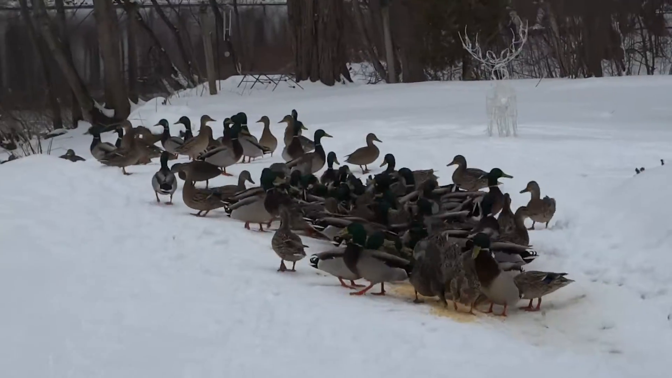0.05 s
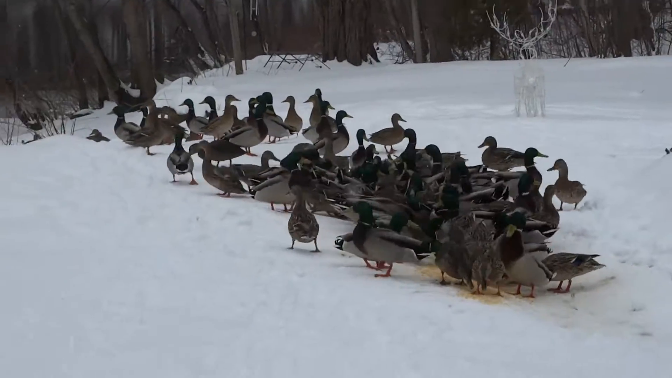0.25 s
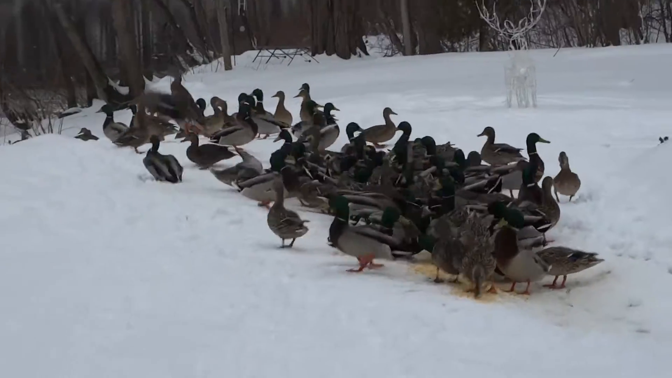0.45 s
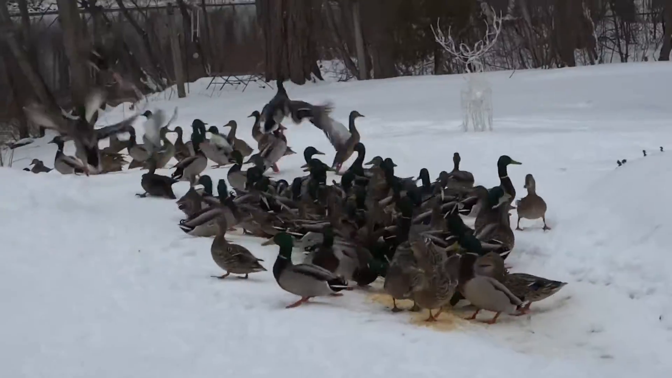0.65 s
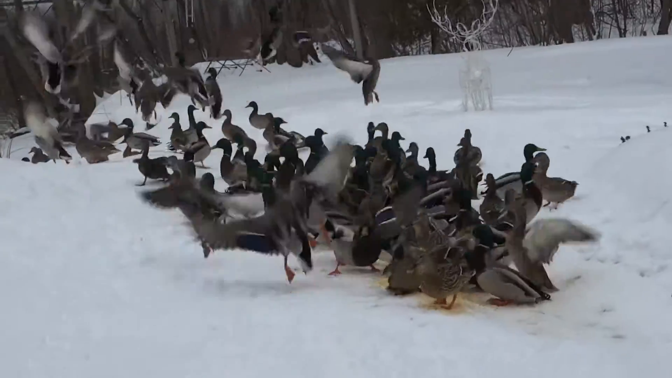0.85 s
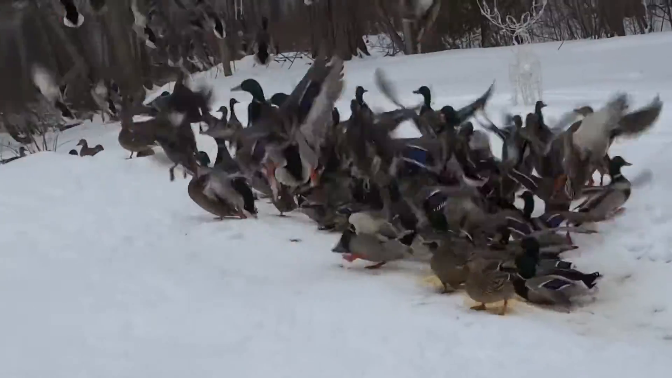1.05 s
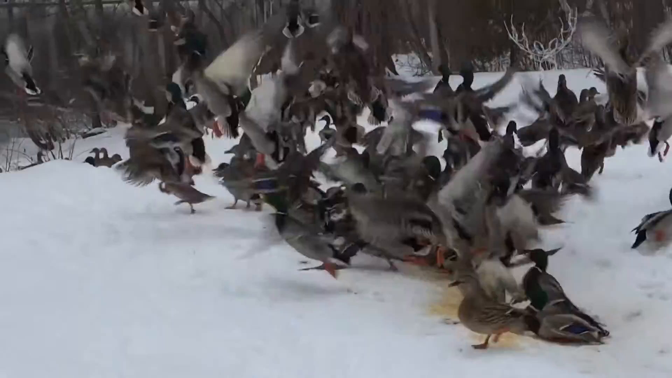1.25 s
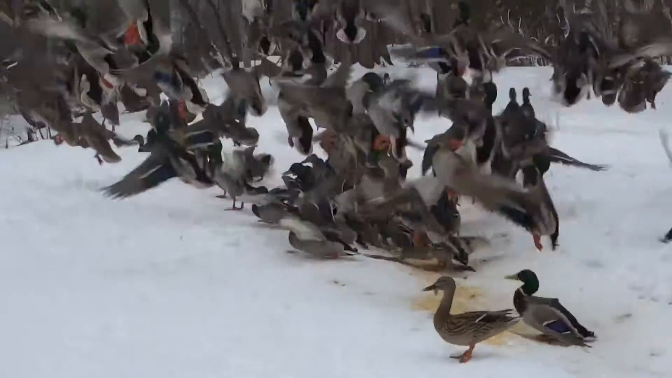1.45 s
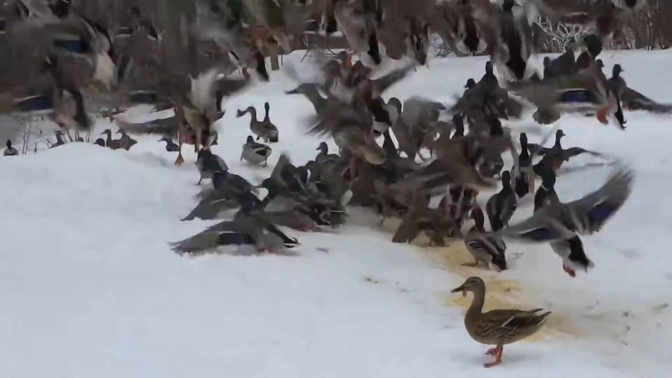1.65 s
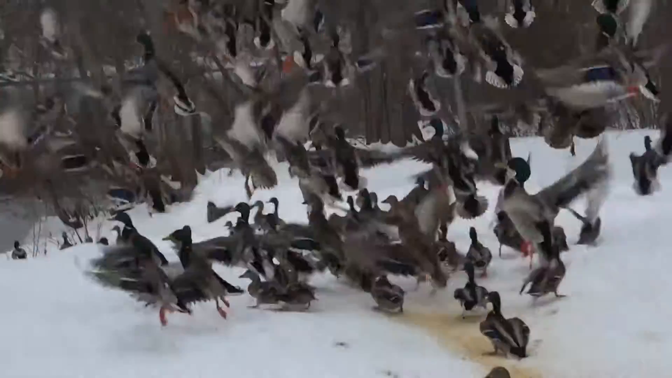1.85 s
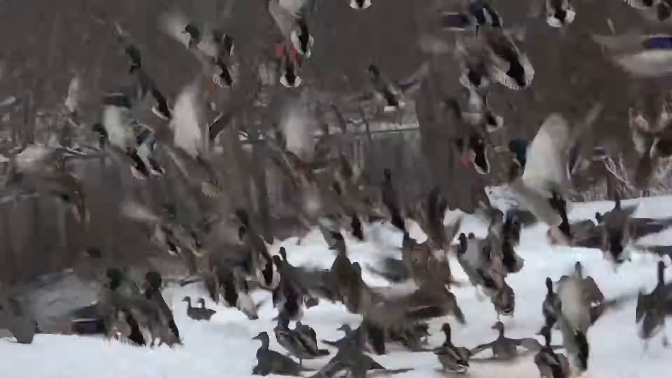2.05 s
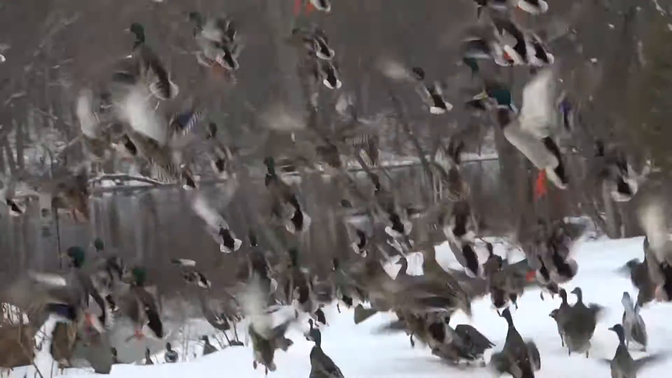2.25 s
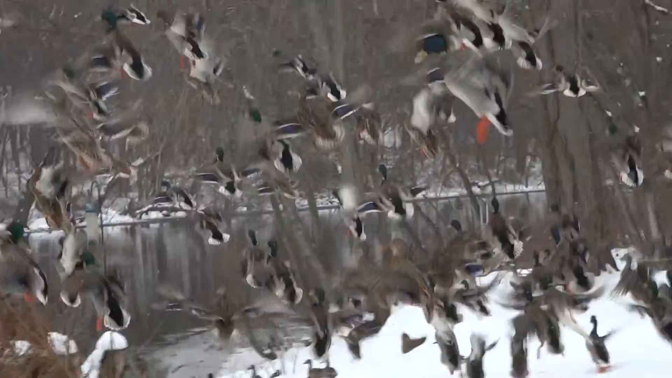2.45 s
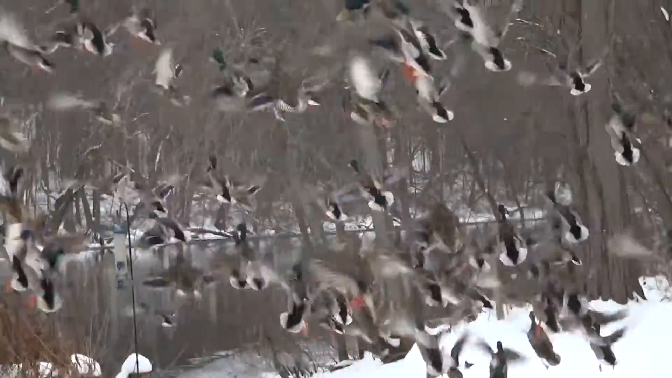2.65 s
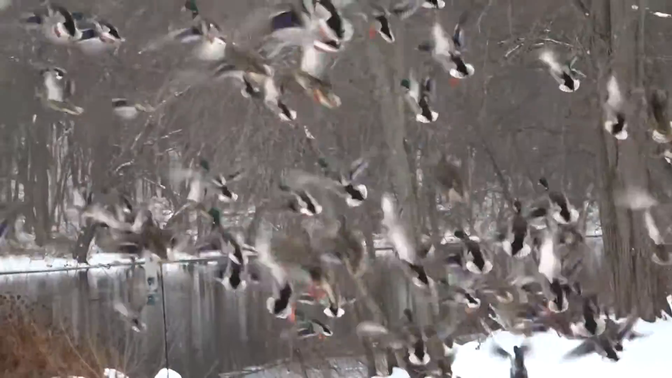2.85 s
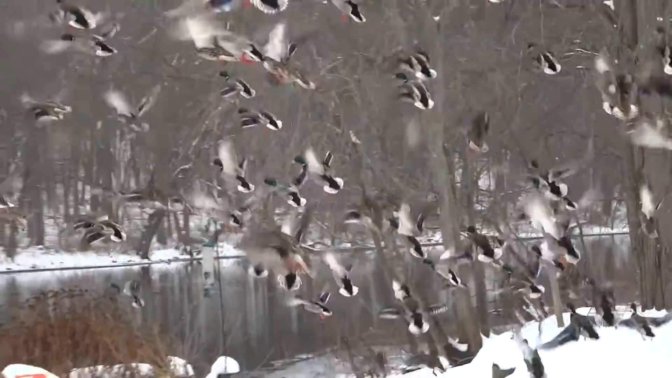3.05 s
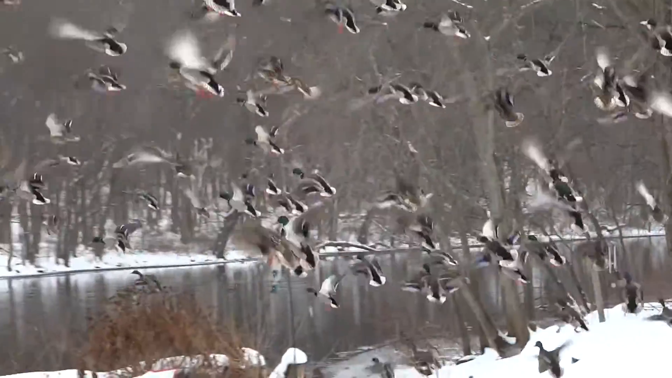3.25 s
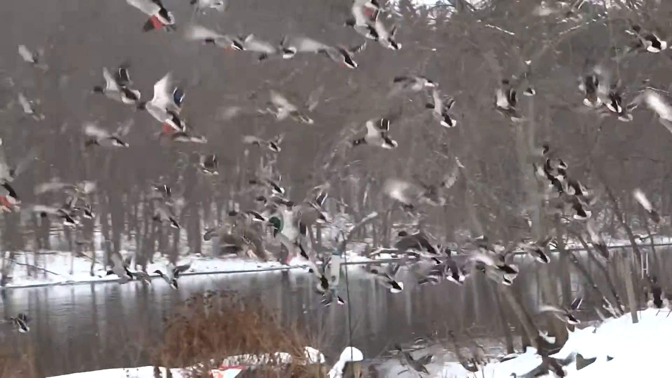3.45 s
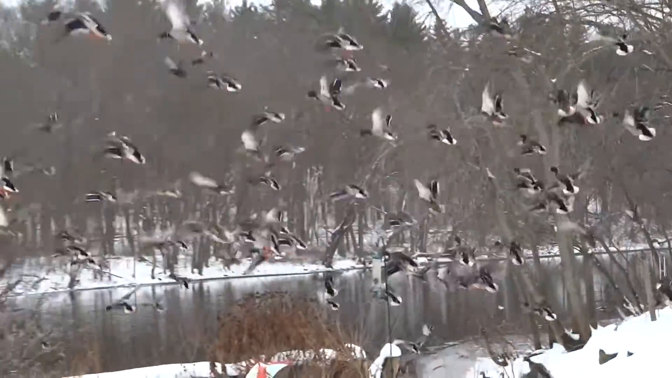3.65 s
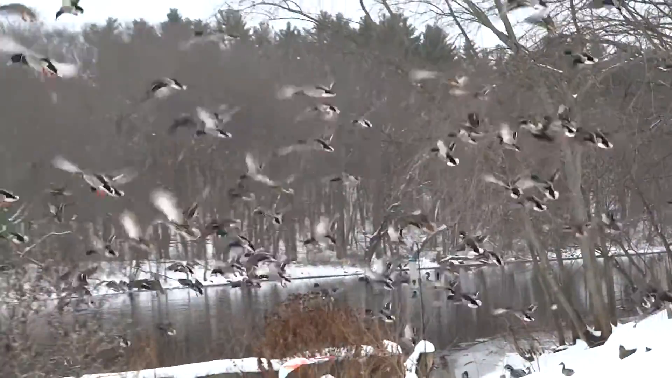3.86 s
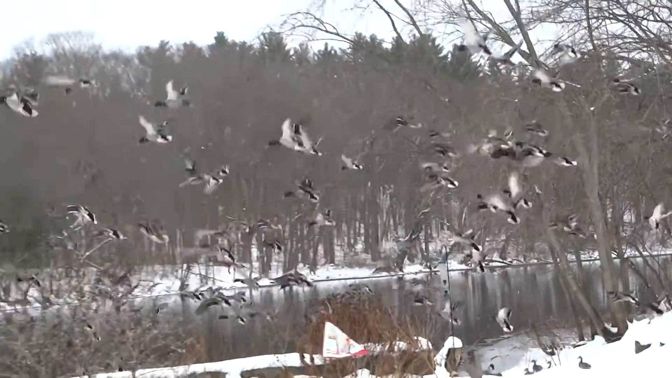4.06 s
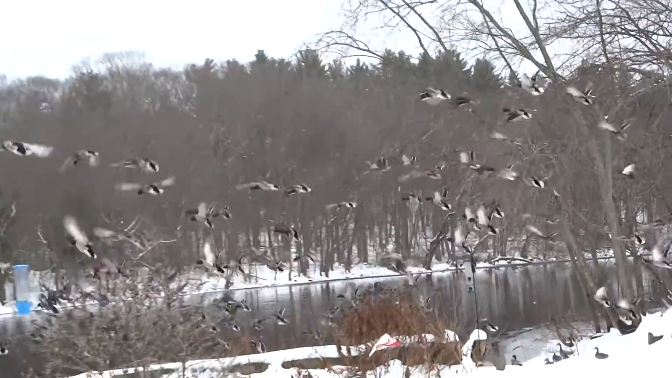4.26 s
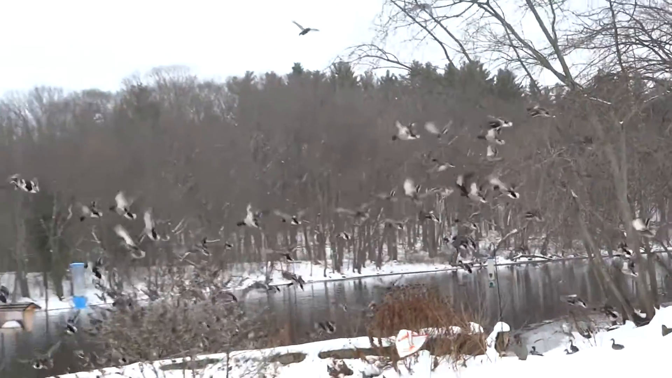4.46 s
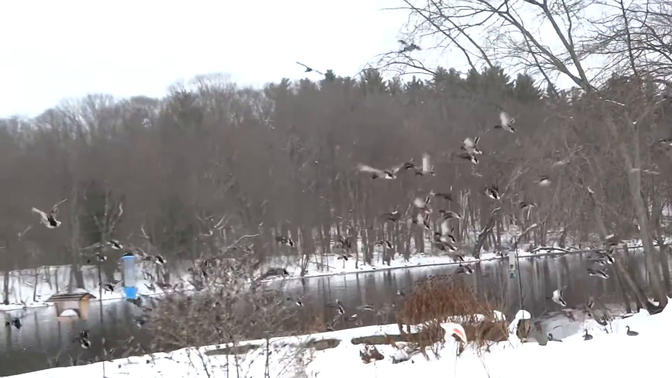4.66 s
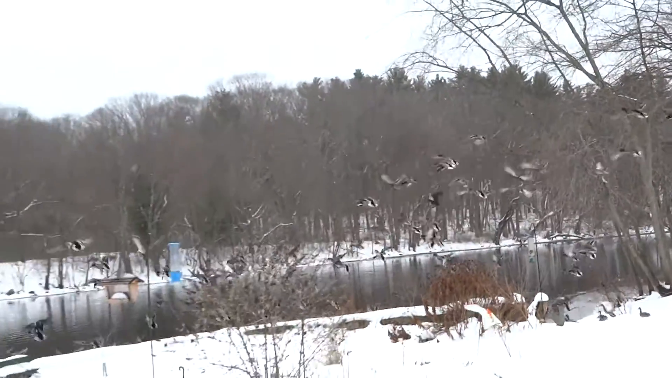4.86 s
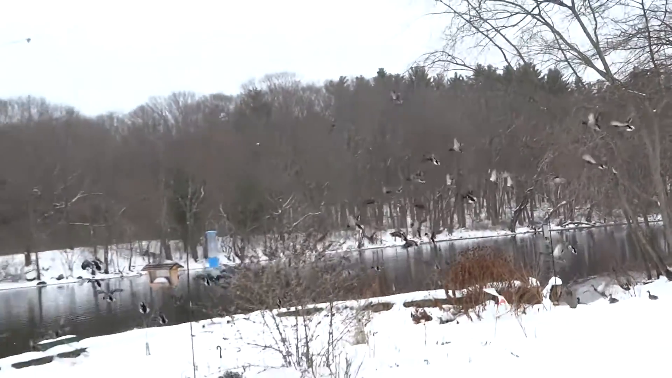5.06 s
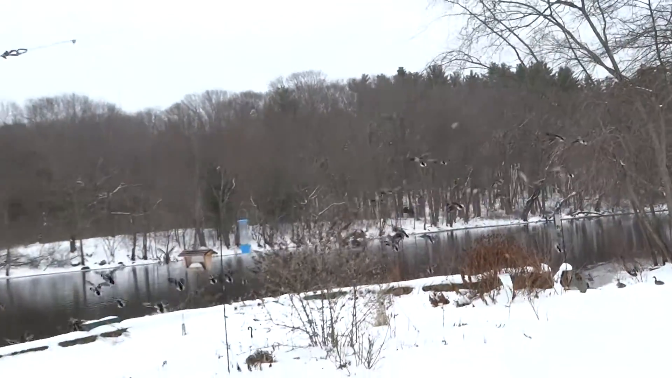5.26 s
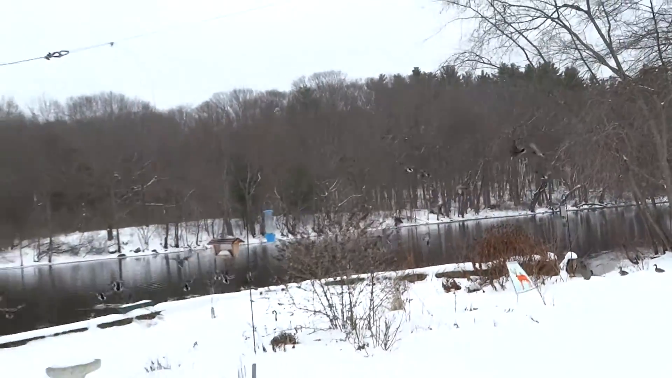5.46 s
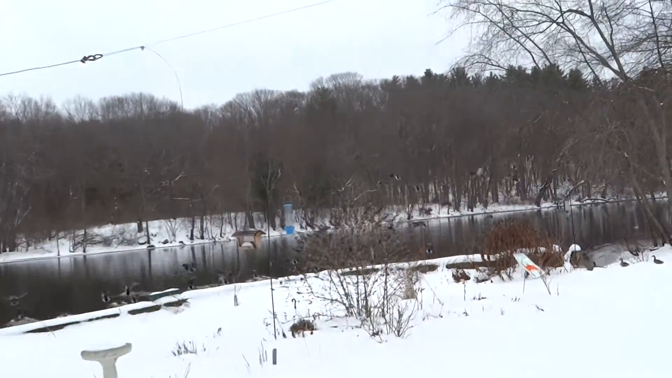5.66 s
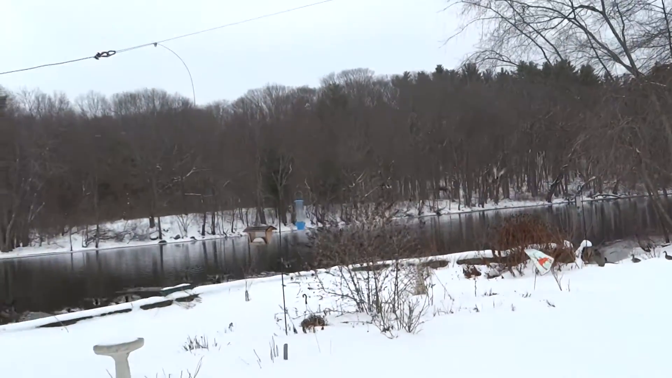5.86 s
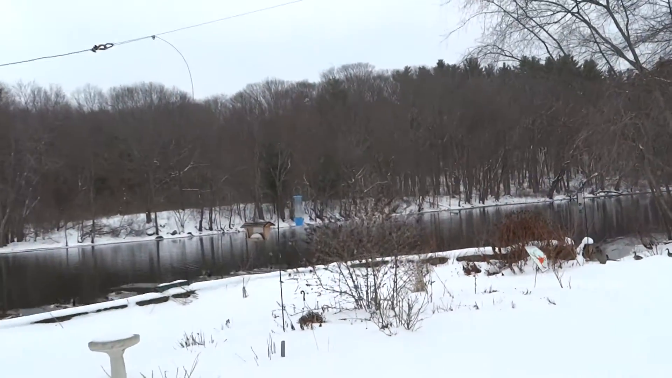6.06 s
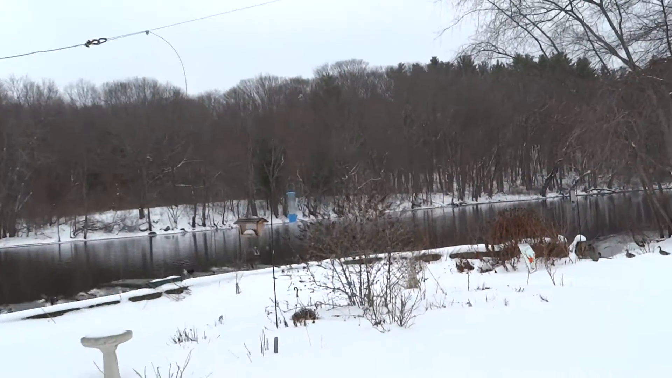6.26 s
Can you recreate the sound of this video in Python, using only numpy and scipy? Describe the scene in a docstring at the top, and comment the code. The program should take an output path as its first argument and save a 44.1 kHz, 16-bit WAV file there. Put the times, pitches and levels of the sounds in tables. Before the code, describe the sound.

Quiet outdoor air by a snowy river, with tiny chirps and dull knocks near the microphone. Three tiny startled clucks, then a big flock of ducks erupts: dense whooshing wings, feathery rustle, low flutter and sharp wing claps. The roar thins out as they leave, and five separate hoarse quacks follow over faint hiss, echoing softly off the wooded far bank.

```python
"""Quiet river air and a faint hiss come first; then ducks burst up from the bank, and their noise dies down,
leaving a steady hiss. Wing strokes, as random puffs of noise, merge into whoosh, rustle and rumble; dying noise
bursts are wing claps. Three short startled clucks precede five hoarse quacks: pulse trains ringing a throat and
bill, with clean partials. A decaying noise tail echoes them off the wooded far bank; a swish, chirps, knocks
and low bumps are small details."""
import sys
import numpy as np
from scipy import signal
from scipy.fft import rfft, irfft, next_fast_len
from scipy.io import wavfile

SR = 44100
rng = np.random.default_rng(int(sys.argv[2]) if len(sys.argv) > 2 else 0)


def generate_wav(signal):
    """Clip the signal to [-1, 1] and save it as 16-bit WAV at the path in sys.argv[1]."""
    frames = np.transpose(np.atleast_2d(signal))
    scaled = np.clip(frames, -1, 1) * 32767
    pcm = np.round(scaled).astype(np.int16)
    wavfile.write(sys.argv[1], SR, pcm)


N = 277931   # length [samples]

# Quiet air and river, spectrum shape: (frequency [Hz], relative density [dB per Hz])
RIVER_AIR_SPECTRUM = [(15, -66), (40, -38), (314, -9), (440, -14), (500, -23), (906, -7), (1060, -12.5),
                      (7350, -55), (12000, -54), (15600, -92), (22000, -120)]
# Level over time of the flock, then of the background hiss left after it:
# (time [s], whoosh level [dB], rustle level [dB], rumble level [dB])
FLOCK_AND_HISS_LEVELS = [(0.0, -50, -60.5, -65), (0.2, -53, -71.5, -70), (0.44, -50.5, -55, -67),
                         (0.63, -51.5, -54, -61), (0.81, -45, -45.5, -57), (1.0, -45, -39.5, -46),
                         (1.16, -30.5, -29.5, -40), (1.28, -28, -28, -37), (1.47, -26, -27, -36),
                         (2.4, -27, -32, -39.5), (2.75, -27.5, -32.5, -41.5), (3.3, -35, -38, -47),
                         (3.8, -40.5, -42, -51.5), (4.1, -46, -43.5, -53.5), (4.7, -48, -45.5, -55.5),
                         (5.35, -49.5, -44.5, -54.5), (6.05, -51.5, -43.5, -59), (6.3, -47.5, -42, -48)]
# Wing air, feathers and low beat, spectrum shapes: (frequency [Hz], relative density [dB per Hz])
WHOOSH_SPECTRUM = [(76, -52), (130, -20), (194, -8.5), (305, 0), (576, 1), (698, 2.5), (920, -10.5),
                   (1030, -8.5), (2190, -15), (3500, -27), (4550, -41), (7700, -120)]
RUSTLE_SPECTRUM = [(530, -21), (900, -5), (1030, -2.5), (1810, -6.5), (2190, -4.5), (2630, -7.5),
                   (4010, -9), (7490, -5), (9310, -11.5), (12400, -24.5), (14200, -27.5), (16000, -36)]
RUMBLE_SPECTRUM = [(11, -38), (18, -7), (49, 5), (107, -2.5), (145, -7.5), (200, -6), (260, -34),
                   (440, -120)]
# Change of the rustle when faint, a duller, steady background hiss: (frequency [Hz], gain [dB])
FAINT_RUSTLE_GAIN = [(1000, -1.5), (2300, 1.5), (3000, 0.5), (4500, -0.5), (6500, -2.5), (8500, -4),
                     (12000, -10.5), (16000, -32)]
# Wings clapping together: (time [s], relative crack level [dB], relative thump level [dB])
WING_CLAPS = [(0.387, -29.5, -49), (0.641, -30, -42), (0.708, -27, -31), (0.9024, -16, -23),
              (0.918, -13, -11.5), (0.9986, -13.5, -40), (1.022, -26, -34), (1.036, 0, -6),
              (1.0507, -5, -7.5), (1.057, -11, -19), (1.095, -26, -32), (1.1171, -4.5, -7.5),
              (1.1276, -17, -4.5), (1.1346, -2.5, -10), (1.1638, -6, -7.5), (1.195, -8.5, -6),
              (1.263, -11, -20), (1.2917, -7, -10), (1.319, -8, -14), (1.3368, -4, -25), (1.357, -12, -1),
              (1.3673, -2.5, -12), (1.392, -7.5, -9), (1.431, -9, -8), (1.436, -3.5, -2.5),
              (1.544, -13, -3.5), (1.559, -8, -14), (1.6065, -5.5, -10.5), (1.65, -12, -29),
              (1.6801, -6, -7), (1.718, -5.5, -24), (1.7706, -6, -13), (1.821, -8, -6), (1.916, -2.5, -34),
              (2.1494, -12, -13), (2.246, -8, -11.5), (2.365, -7, -10), (2.544, -9, -12), (2.5607, -9, -12),
              (2.582, -8, -22), (2.699, -17, -26), (2.866, -9.5, -18), (2.884, -16, -20),
              (2.972, -13, -13.5), (2.9854, -16, -18), (3.027, -16, -19), (3.0798, -6, -10.5),
              (3.1904, -9, -16), (3.233, -21, -22), (3.4491, -18, -24)]
# Clap resonances, two for the thump, then the crack: (frequency [Hz], width [Hz], level [dB])
CLAP_RESONANCES = [(674, 400, 0), (2170, 1860, -4), (4040, 1800, -14), (7350, 1620, -2),
                   (10300, 2800, -17.5)]
# Short thin chirps: (start [s], peak level [dB], frequency [Hz])
CHIRP_TONES = [(0.421, -57, 4300), (0.426, -49, 5200), (0.500, -51, 4320), (0.501, -52, 8640)]
# Dull knocks close to the microphone: (time [s], relative level [dB], hardness [dB per octave])
KNOCK_EVENTS = [(0.4884, -25, 9), (0.495, -29, -6), (0.511, -33, -3), (0.536, -31, -5), (0.550, -27, 1),
                (0.563, -26.5, -1)]
# Ringing modes of a knock: (frequency [Hz], level [dB], time to fall 60 dB [s])
KNOCK_RESONANCES = [(165, -7, 0.037), (268, -5, .025), (476, 3.5, 0.017), (1120, -8, 0.0095)]
# Single wing strokes close by: (time [s], relative level [dB])
CLOSE_STROKES = [(0.638, -37), (0.675, -34), (0.714, -36), (0.781, -30), (0.884, -26), (0.914, -21.5),
                 (1.035, -19), (1.126, -19), (1.185, -11.5), (1.253, -13), (1.347, -17), (1.432, -23),
                 (1.525, -9), (1.564, -8), (1.631, -14), (1.697, -25), (1.776, -9.5), (1.863, -21),
                 (1.943, -15), (2.044, -12), (2.132, -15), (2.178, -14), (2.311, -15), (2.414, -22),
                 (2.54, -16), (2.599, -15), (2.753, -19), (2.809, -20), (2.86, -16), (2.91, -23),
                 (3.063, -23), (3.267, -22)]
# Calls, three short startled ones first: (start [s], length [s], swell [s], release [s], relative level [dB],
# highest pulse rate [pulses per s], relative bill rasp [dB], relative clean partials [dB])
CALLS = [(0.777, 0.021, .004, 0.0068, -46, 400, -9, -2), (0.808, 0.029, .004, .008, -43, 460, -11, 3),
         (0.852, .035, .004, .008, -47, 400, -9, 4), (3.745, 0.19, .045, 0.017, -26.5, 430, 1, 2.5),
         (4.262, .21, 0.045, 0.0067, -29, 420, 3, 0.5), (4.775, 0.23, 0.023, 0.02, -28, 415, 0, 1.5),
         (5.35, .235, 0.054, .04, -28, 416, -1.5, -4), (5.96, 0.27, 0.056, 0.11, -37.5, 395, -0.5, 0.5)]
# Brief dips in the voice inside the long quacks: (time [s], gain at the deepest point [dB])
VOICE_CATCHES = [(3.842, -1.5), (4.39, -3), (4.878, -2.5), (5.427, -1), (6.055, -1.5)]
# Throat resonances, the last two sounding with the bill: (frequency [Hz], width [Hz], level [dB])
THROAT_RESONANCES = [(1310, 154, -9.5), (1796, 295, -1), (2186, 195, 5), (3020, 385, -13), (4090, 390, -19)]
# Bill resonances, the bright rasp: (frequency [Hz], width [Hz], level [dB])
BILL_RESONANCES = [(5460, 240, -28), (6280, 1200, -22)]
# Clean partials at 1, 2, 3 times the pulse rate: (relative level [dB])
CLEAN_PARTIALS = [-23, -16.5, -19]
# Low bumps in the microphone body: (time [s], level [dB])
BODY_BUMPS = [(6.245, -36), (6.258, -27), (6.281, -32)]
# Stereo width: (frequency [Hz], side minus mid level [dB])
STEREO_WIDTH = [(60, -36), (140, -25.5), (770, -17.5), (1300, -19), (2300, -21.5), (3200, -24),
                (5000, -32.5), (8800, -75), (9600, -11.5), (10800, -9), (11800, -38), (16000, -50)]

RIVER_AIR_DB = -55.5
FAINT_DB, FULL_DB = -46, -33   # rustle levels of the steady hiss and of the flock with distinct strokes
SWISH_S, SWISH_DB, SWISH_RISE_S, SWISH_FALL_S = 0.172, -50, 0.006, 0.042
CRACK_S, THUMP_S = 0.0015, 0.003   # decay times
SNAP = 2.5   # first spike of a crack, against its noise
KNOCK_MID_HZ = 480   # hardness tilts the modes about this pitch
FLAP_RISE_S, FLAP_FALL_S = 0.0062, 0.0097
ONSET_DB = -8.5   # a call starts firmly, below its full level
ARCH_TOP, START_SAG, END_SAG = 0.65, 0.17, 0.12   # place of the highest rate, shares lost at start and end
CATCH_S = 0.015
WAVER_DB, WAVER_S = 1.0, 0.012   # unsteadiness of the voice level
RASP_WAVER_DB, RASP_WAVER_S = 3.5, 0.012   # the rasp comes in swells
JITTER_S, SHIMMER_DB = 0.00005, 2.2   # random spread of pulse times and sizes
VOICE_TOP_HZ = 8000
BUMP_HZ, BUMP_T60_S = 81.3, 0.041
CUTOFF_HZ = 16500


def from_db(db):
    """Amplitude ratio: 20 dB is a factor of ten."""
    return 10 ** (np.asarray(db) / 20)


def rms_one(x):
    """Power normalisation: scale to an rms of 1."""
    return x / np.sqrt(np.mean(x ** 2) + 1e-20)


def in_time(rows):
    """Linear interpolation: table columns become curves at the sample rate."""
    s, *columns = np.transpose(rows)
    return [np.interp(np.arange(N) / SR, s, column) for column in columns]


def colour(x, points):
    """Linear filtering: multiply the spectrum by a gain curve drawn over log frequency."""
    size = next_fast_len(N)
    hz = np.maximum(np.arange(size // 2 + 1) * SR / size, 1)
    point_hz, point_db = np.array(points)[:, 0], np.array(points)[:, 1]
    db = np.interp(np.log(hz), np.log(point_hz), point_db)
    return irfft(rfft(x, size) * from_db(db), size)[:N]


def resonate(x, modes):
    """Resonance: parallel damped two-pole modes with alternating signs."""
    out = 0
    for k, (hz, width_hz, db) in enumerate(modes):
        radius = np.exp(-np.pi * width_hz / SR)
        poles = [1, -2 * radius * np.cos(2 * np.pi * hz / SR), radius * radius]
        zeros = (1 - radius * radius) / 2 * np.array([1, 0, -1])
        out = out + (-1) ** k * from_db(db) * signal.lfilter(zeros, poles, x + 1e-18)
    return out


def dying(clicks, length_s):
    """Exponential decay: each click jumps up and dies away."""
    return signal.lfilter([1], [1, -np.exp(-1 / (length_s * SR))], clicks + 1e-18)


def wavering(length_s):
    """Random modulation: twice-smoothed noise of rms 1."""
    return rms_one(dying(dying(rng.standard_normal(N), length_s), length_s))


def place(events):
    """Superposition: add up short sounds, each given as (start [s], samples)."""
    out = np.zeros(N + SR)
    for s, sound in events:
        at = round(s * SR)
        out[at:at + len(sound)] += sound
    return out[:N]


def river_air():
    """Stationary noise: coloured noise is the quiet air and river."""
    return from_db(RIVER_AIR_DB) * colour(rng.standard_normal(N), RIVER_AIR_SPECTRUM)


def strokes(spectrum, distinct, per_s, length_s, spread_db, steady):
    """Shot noise: random puffs, quick to rise and slower to fall, shape air noise over a steady blur."""
    happens = rng.random(N) < per_s / SR
    sizes = from_db(spread_db * np.minimum(rng.exponential(1, N), 4)) * happens
    puffs = rms_one(dying(dying(sizes, length_s), length_s / 6))
    envelope = rms_one(steady + puffs) ** distinct   # a small exponent flattens the single strokes
    return rms_one(colour(rng.standard_normal(N) * envelope, spectrum))


def flock_and_hiss():
    """Summation of many strokes: whoosh, rustle with sharp snaps, and rumble; when faint, a steady hiss."""
    whoosh_db, rustle_db, rumble_db = in_time(FLOCK_AND_HISS_LEVELS)
    # single strokes and snaps fade where the rustle is faint
    distinct = np.clip((rustle_db - FAINT_DB) / (FULL_DB - FAINT_DB), 0.03, 1)
    whoosh = strokes(WHOOSH_SPECTRUM, distinct, per_s=150, length_s=0.0083, spread_db=2.0, steady=2.33)
    rustle = strokes(RUSTLE_SPECTRUM, distinct, per_s=41, length_s=0.0076, spread_db=-3.0, steady=3.9)
    snaps = strokes(RUSTLE_SPECTRUM, 1.0, per_s=77, length_s=0.0013, spread_db=8.5, steady=0.01)
    rumble = strokes(RUMBLE_SPECTRUM, 0.73, per_s=39, length_s=0.046, spread_db=11.0, steady=4.9)
    dull_hiss = colour(rustle, FAINT_RUSTLE_GAIN)
    bright = distinct * (rustle + from_db(-16.0) * snaps) + (1 - distinct) * dull_hiss
    return from_db(whoosh_db) * whoosh + from_db(rustle_db) * bright + from_db(rumble_db) * rumble


def swish():
    """Resonant noise: a feather swish is a soft bright hiss that rises quickly and decays."""
    bright_modes = [(5800, 1250, 1.0), (6840, 1450, 1.0), (8000, 790, -2.0)]   # (Hz, width Hz, dB)
    hiss = rms_one(resonate(rng.standard_normal(N), bright_modes))
    since = np.maximum(np.arange(N) / SR - SWISH_S, 0)
    envelope = (1 - np.exp(-since / SWISH_RISE_S)) * np.exp(-since / SWISH_FALL_S)
    return from_db(SWISH_DB) * envelope * hiss


def claps():
    """Impulsive excitation: dying noise bursts ring a bright crack and a lower thump."""
    clicks = np.zeros((2, N))
    s, *levels_db = np.transpose(WING_CLAPS)
    clicks[:, np.round(s * SR).astype(int)] = from_db(levels_db)
    envelopes = [dying(clicks[0], CRACK_S), dying(clicks[1], THUMP_S)]
    crack, thump = rng.standard_normal((2, N)) * envelopes
    return resonate(thump, CLAP_RESONANCES[:2]) + resonate(crack + SNAP * clicks[0], CLAP_RESONANCES[2:])


def chirps():
    """Windowed pure tone: a steady pitch under a brief bell-shaped envelope."""
    t = np.arange(SR // 10) / SR
    bell = np.exp(-((t - 0.006) / 0.0049) ** 2)
    return place((s, from_db(db) * np.sin(2 * np.pi * hz * t) * bell) for s, db, hz in CHIRP_TONES)


def knocks():
    """Modal decay: every knock rings the same dull modes, a harder one more brightly."""
    t = np.arange(SR // 10) / SR
    attack = np.minimum(t / 0.00047, 1)
    events = []
    for s, db, hard_db in KNOCK_EVENTS:
        for k, (hz, mode_db, t60) in enumerate(KNOCK_RESONANCES):
            level_db = db + mode_db + hard_db * np.log2(hz / KNOCK_MID_HZ) - 60 * t / t60
            events.append((s, (-1) ** k * from_db(level_db) * np.sin(2 * np.pi * hz * t) * attack))
    return place(events)


def flaps():
    """Transient turbulence: a close stroke is one puff of whoosh with some rustle."""
    clicks = np.zeros(N)
    s, db = np.transpose(CLOSE_STROKES)
    clicks[np.round(s * SR).astype(int)] = from_db(db)
    puffs = dying(clicks, FLAP_FALL_S) - dying(clicks, FLAP_RISE_S)
    air = rng.standard_normal(N)
    whoosh, rustle = rms_one(colour(air, WHOOSH_SPECTRUM)), rms_one(colour(air, RUSTLE_SPECTRUM))
    return puffs * (whoosh + from_db(-8.5) * rustle)


def quack_shape():
    """Effort control: a call swells, holds and stops while its rate arches; rasp needs full effort."""
    t = np.arange(N) / SR
    gain, rasp, clear = np.zeros((3, N))
    per_s = np.full(N, CALLS[0][5] * 1.0)
    for s, length_s, swell_s, release_s, db, top_per_s, rasp_db, clear_db in CALLS:
        on = (t >= s) & (t < s + length_s)
        since = t[on] - s
        swell = from_db(ONSET_DB * np.clip(1 - since / swell_s, 0, 1))
        effort = swell * np.clip((length_s - since) / release_s, 0, 1)
        gain[on], rasp[on] = from_db(db) * effort, from_db(rasp_db) * effort
        part = since / length_s
        start_sag = START_SAG * (1 - part / ARCH_TOP) ** 2
        end_sag = END_SAG * ((part - ARCH_TOP) / (1 - ARCH_TOP)) ** 2
        per_s[on] = top_per_s * (1 - np.where(part < ARCH_TOP, start_sag, end_sag))
        clear[on] = from_db(clear_db)
    catch = from_db(sum(db * np.exp(-((t - s) / CATCH_S) ** 2) for s, db in VOICE_CATCHES))
    gain = gain * catch * from_db(WAVER_DB * wavering(WAVER_S))
    rasp = rasp * catch * from_db(RASP_WAVER_DB * wavering(RASP_WAVER_S))
    return gain, rasp, clear, per_s


def quacks():
    """Source and filter: uneven strong-weak pulse pairs ring throat and bill beside clean low partials."""
    gain, rasp, clear, per_s = quack_shape()
    cycles = np.cumsum(per_s) / SR
    at = np.flatnonzero(np.diff(np.floor(cycles)))
    chance = rng.standard_normal((3000, 2))[:len(at)]
    weak_db = np.interp(per_s[at], [350, 410], [-14, -4])   # slack, slow pulses alternate more
    pulse_db = SHIMMER_DB * np.clip(chance[:, 1], -2, 2) + weak_db * (np.arange(len(at)) % 2)
    pulses = np.zeros(N + 99)
    pulses[at + np.round(JITTER_S * SR * chance[:, 0]).astype(int)] = from_db(pulse_db)
    pulses = pulses[:N]
    breath = 0.034 * dying(pulses, 0.0057) * rng.standard_normal(N)
    throat = resonate(pulses + breath, THROAT_RESONANCES[:3])
    bill = resonate(pulses + 1.7 * breath, BILL_RESONANCES) - resonate(pulses + breath, THROAT_RESONANCES[3:])
    clean = sum(from_db(db) * np.sin(2 * np.pi * (k + 1) * cycles) for k, db in enumerate(CLEAN_PARTIALS))
    unsteady = clear * from_db(2.4 * wavering(0.01))   # the partials come and go
    voice = gain * ((throat + rasp * bill) / np.std(throat) + unsteady * clean)
    return signal.sosfilt(signal.butter(4, VOICE_TOP_HZ, fs=SR, output="sos"), voice)


def far_bank(x, t60_s=0.57, wet_db=-19):
    """Diffuse reflection: trees scatter back a dull echo, a decaying noise response."""
    t = np.arange(SR) / SR
    onset = np.clip((t - 0.02) / 0.025, 0, 1)
    tail = rng.standard_normal(SR) * from_db(-60 * t / t60_s) * onset
    tail = signal.sosfilt(signal.butter(1, 3500, fs=SR, output="sos"), tail)
    return from_db(wet_db) * signal.fftconvolve(x, tail / np.linalg.norm(tail))[:N]


def bumps():
    """Damped oscillation: one low mode thuds in the microphone body."""
    t = np.arange(SR // 10) / SR
    ring = np.sin(2 * np.pi * BUMP_HZ * t)
    return place((s, from_db(db - 60 * t / BUMP_T60_S) * ring) for s, db in BODY_BUMPS)


def scene():
    """Mid and side superposition: a faint smeared copy gives width, the voice sits a little right."""
    voice = quacks()
    small_sounds = swish() + chirps() + knocks() + bumps()
    wide = river_air() + flock_and_hiss() + claps() + flaps() + small_sounds + far_bank(voice)
    smear = rng.standard_normal(2000) * np.exp(-np.arange(2000) / 500)
    smeared = signal.fftconvolve(wide, smear / np.linalg.norm(smear))[:N]
    side = colour(smeared - 1.02 * voice, STEREO_WIDTH)
    return wide + voice + side * [[1], [-1]]   # left, right


def record(dry):
    """Band limitation: a steep low-pass cuts the top."""
    return signal.sosfilt(signal.cheby2(14, 70, CUTOFF_HZ, fs=SR, output="sos"), dry)


dry = scene()
out = record(dry)
generate_wav(out)
```